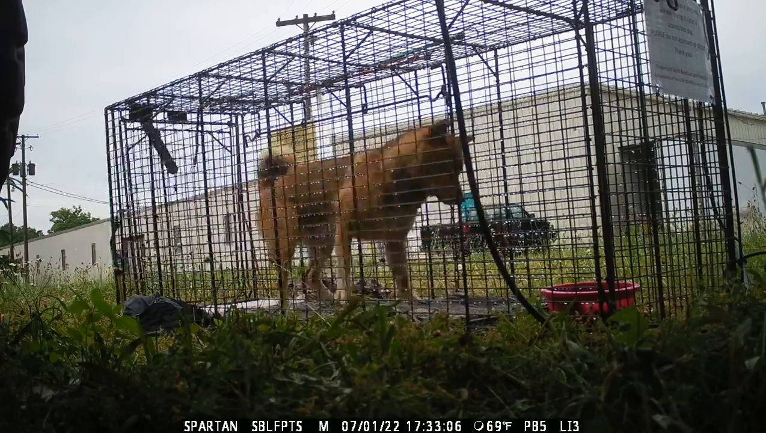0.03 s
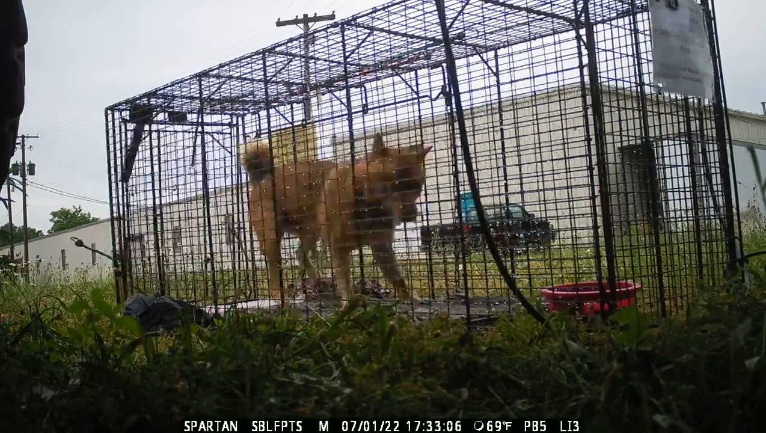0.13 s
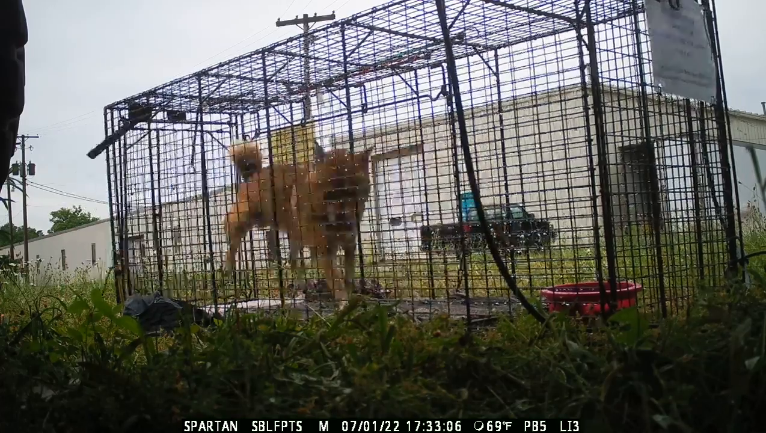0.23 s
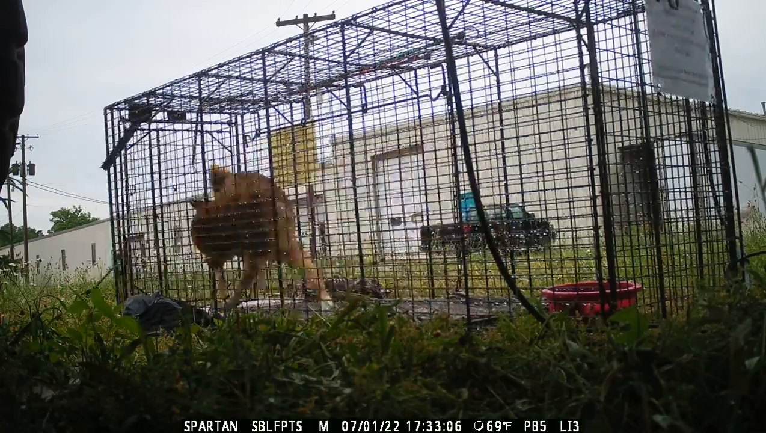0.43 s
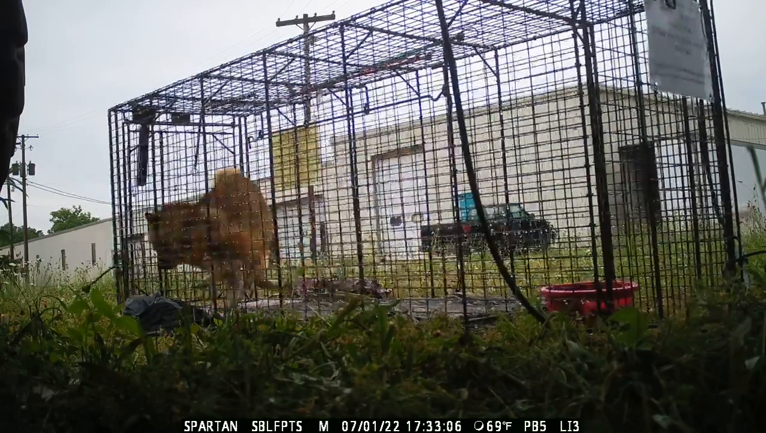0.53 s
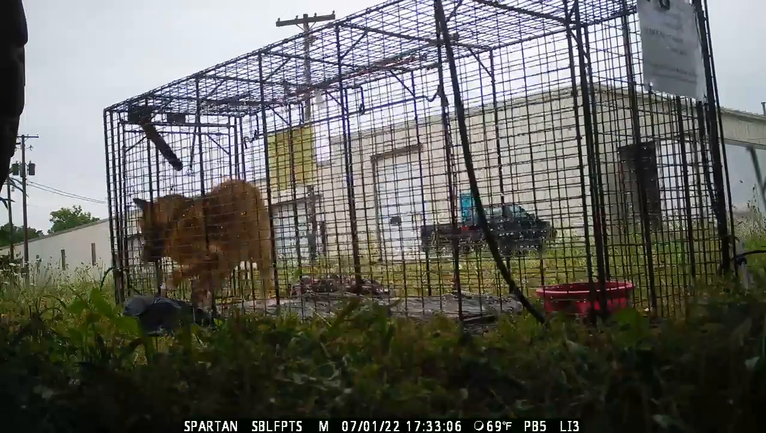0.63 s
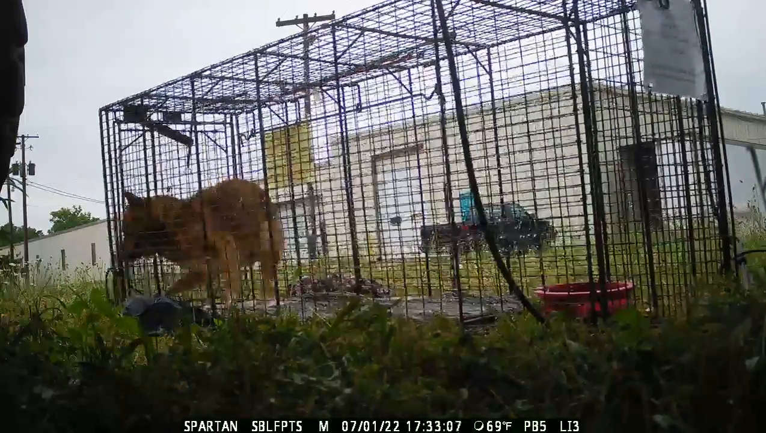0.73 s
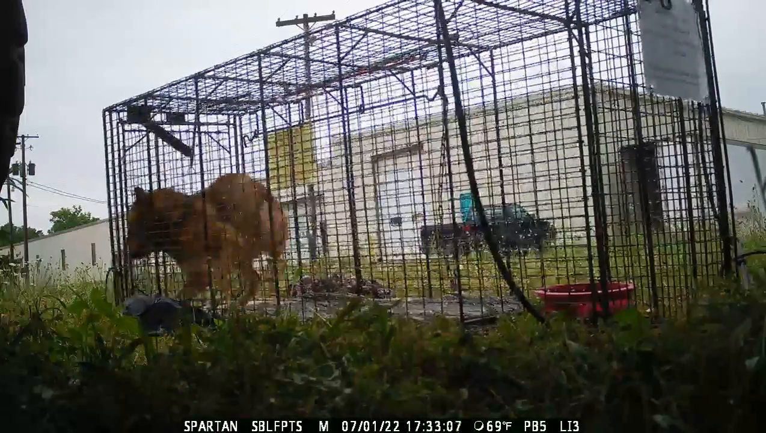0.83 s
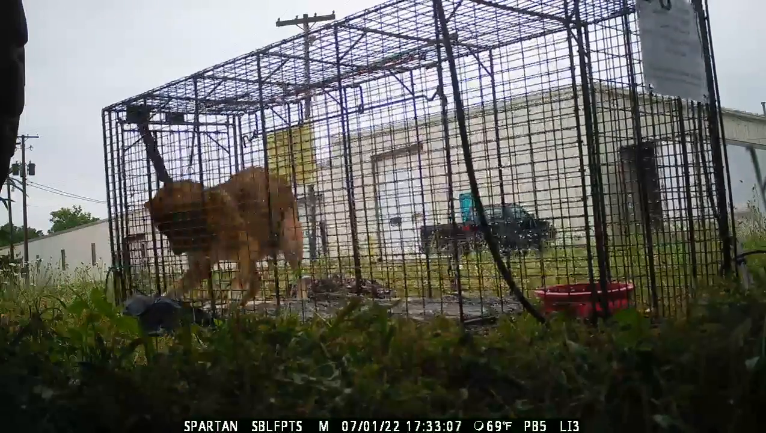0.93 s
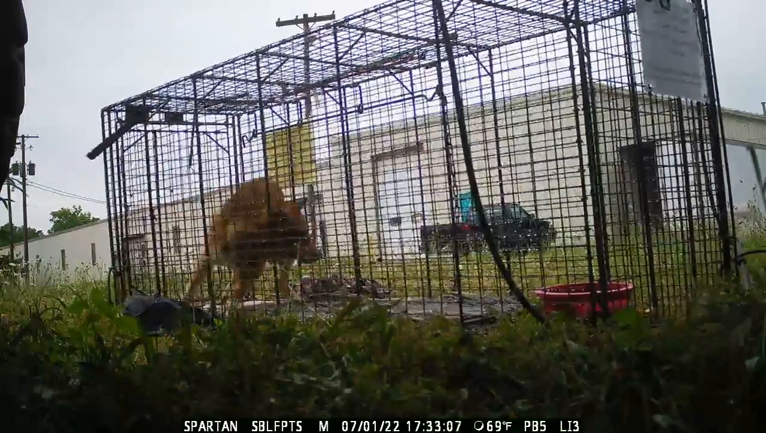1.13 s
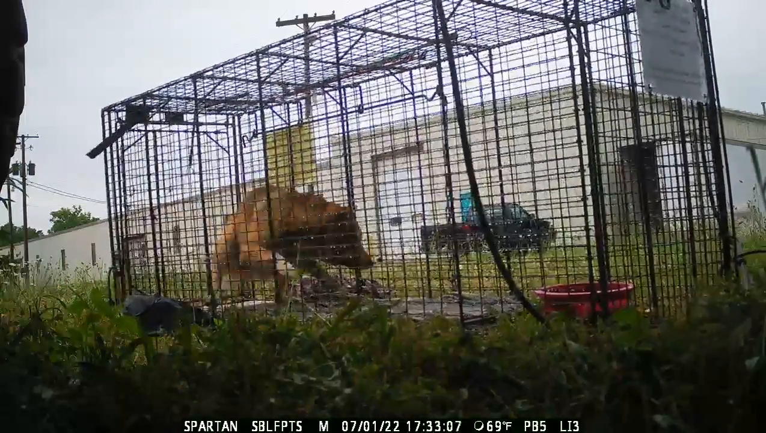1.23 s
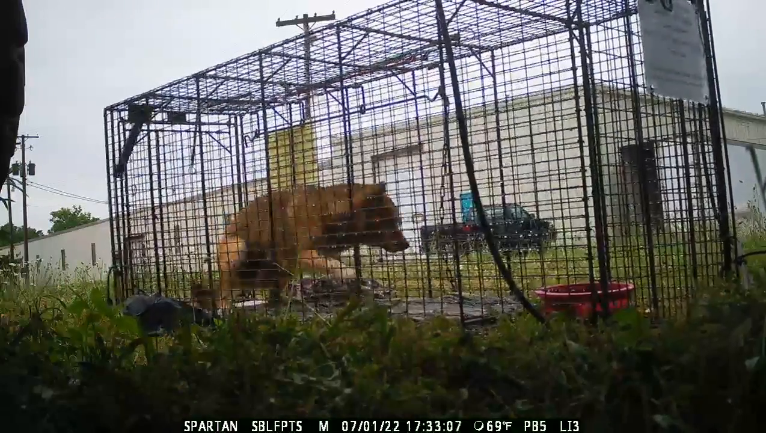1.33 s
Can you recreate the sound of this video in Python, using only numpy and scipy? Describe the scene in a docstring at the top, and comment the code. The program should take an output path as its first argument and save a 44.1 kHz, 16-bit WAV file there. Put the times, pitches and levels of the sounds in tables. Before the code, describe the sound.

A wire cage door clashes shut, then the mesh rattles as a dog turns inside.

```python
"""The door of a wire cage trap clashes shut on grass, rebounds and rattles, close to a small camera.
Each impact excites the modes of door and mesh: a bright clink, a chatter, a ring of long wires.
A dog turns round inside: its paws knock the floor and jolt the mesh, whose wires buzz and squeak.
The frame shudders on the ground, and a low outdoor rumble with a faint hum lies underneath."""
import sys
import numpy as np
from scipy import signal
from scipy.fft import rfft, irfft, next_fast_len
from scipy.io import wavfile
from scipy.ndimage import uniform_filter1d, map_coordinates

SR = 44100
rng = np.random.default_rng(int(sys.argv[2]) if len(sys.argv) > 2 else 0)


def store_wav(level_fs):
    """Save 16-bit WAV to argv[1]."""
    pcm = np.round(np.clip(np.atleast_2d(level_fs), -1, 1) * 32767)
    wavfile.write(sys.argv[1], SR, pcm.T.astype(np.int16))


N = 61739
TIME = np.arange(N) / SR

# Spectrum of the outdoor rumble. Each row: frequency in Hz, relative level in dB.
RUMBLE_SPECTRUM = [(20, -8.5), (45, 0.5), (90, 3.5), (200, -4.5), (300, -7), (700, -11), (2000, -10),
                   (5000, -21), (9000, -42.5)]
# Partials of the hum. Each row: frequency in Hz, level in dB.
HUM_PARTIALS = [(44, -68.5), (88, -57.5), (133, -62), (180, -64.5), (221, -66.5)]
# The whole cage shudders on the ground. Each row: time in seconds, level in dB.
SHUDDERS = [(.236, -46.5), (.28, -45), (0.336, -52.5), (.372, -54), (0.404, -47.5), (0.524, -52),
            (.76, -52.5)]
# Response of the frame. Each row: frequency in Hz, relative level in dB.
FRAME_SPECTRUM = [(20, -13), (42, 26), (65, 9), (100, 2), (155, 18), (240, 2.5), (500, -0.5), (1200, -14)]
# Paws on the cage floor. Each row: time in seconds, level in dB.
PAW_KNOCKS = [(0.506, -46), (0.696, -46), (.752, -51), (0.828, -49), (.858, -55), (.972, -60), (1.124, -58),
              (1.23, -51)]
# Response of the floor pan. Each row: frequency in Hz, relative level in dB.
FLOOR_SPECTRUM = [(60, -8), (160, -2), (260, -21.5), (390, 3.5), (560, -7.5), (1500, -28.5)]
# Wire rubbing on wire. Each row: centre in seconds, pitch in Hz, level in dB, half length in seconds.
SQUEAKS = [(0.112, 2646, -46.5, 0.014), (0.182, 5380, -51, .02), (0.295, 1218, -37.5, 0.015),
           (0.296, 3055, -33.5, 0.016), (0.33, 2830, -33.5, 0.012), (0.349, 3030, -34.5, 0.024),
           (0.393, 1812, -31, 0.0088), (0.789, 2956, -45, 0.02), (0.927, 2650, -34.5, 0.012),
           (1.077, 3970, -47.5, 0.0068), (1.095, 5130, -42, 0.038), (1.264, 2672, -52, 0.022),
           (1.262, 3953, -53.5, 0.041), (1.33, 5110, -56.5, 0.054)]
# Response of the mesh. Each row: frequency in Hz, relative level in dB.
MESH_SPECTRUM = [(100, -27.5), (300, -14), (650, -14), (950, -6.5), (1210, -1), (1550, -5), (1680, -3),
                 (1800, 9.5), (1930, -3), (2150, -1.5), (2450, -2.5), (2700, 2.5), (3050, 3.5), (3300, -1),
                 (3600, -8.5), (4000, 1.5), (4450, -2), (4850, 4.5), (5600, 2.5), (5950, -9.5), (6350, -3),
                 (7050, -14.5), (7500, -7), (8000, -21.5), (8400, -22.5), (9200, -54)]
# Envelope of the loose wires' buzz. Each row: time in seconds, level in dB.
RATTLE_LEVELS = [(0, -59.5), (.06, -58), (.14, -57.5), (.21, -51), (.25, -43), (.32, -39), (.42, -35.5),
                 (.49, -39.5), (.54, -46), (.62, -46.5), (.68, -41), (.76, -42), (.82, -47.5), (.94, -44.5),
                 (1.02, -46.5), (1.1, -47), (1.26, -49.5), (1.33, -50.5), (1.4, -59.5)]
# Long wires of door and frame. Each row: frequency in Hz, relative level in dB, T60 in seconds.
WIRE_MODES = [(888, -13, .45), (1203, -2, .35), (1775, -9, .5), (1808, -5, .45), (2643, 2, .5),
              (2857, -2, .4), (2955, -1, .55), (3055, -1, .35), (3968, -2, .5), (4216, -4, .45),
              (4705, -8, .45), (4870, -5, .45), (5114, -3, .7), (5430, -6, .4), (5701, -5, .45)]
# Wire striking wire. Each row: time in seconds, treble, middle and low levels in dB,
# T60 of the chatter in seconds, swell time in seconds.
CLASHES = [(0.0969, -50.5, -45.5, -44, 0.03, 0.0013), (.172, -54, -53, -52.5, 0.22, .012),
           (.226, -21.5, -41.5, -31, 0.043, 0.004), (.234, -29, -31, -28.5, 0.047, 0.0052),
           (0.265, -27.5, -33, -31.5, 0.095, 0.012), (0.279, -30, -29, -37, 0.2, .005),
           (.297, -29.5, -30.5, -32.5, 0.23, 0.0029), (0.339, -39.5, -38, -41, 0.15, 0.001),
           (.364, -27, -29.5, -36, 0.045, 0.0047), (.373, -32, -41, -32, 0.31, .001),
           (.411, -39.5, -52.5, -46.5, 0.16, 0.0023), (.449, -36, -39, -39.5, 0.25, 0.0071),
           (0.577, -37, -48, -44, 0.046, 0.0011), (0.612, -55.5, -46.5, -51, .08, 0.0059),
           (0.6412, -42, -52, -45.5, .08, .004), (0.6889, -32, -38, -39, 0.035, 0.0084),
           (.702, -47, -37, -42.5, 0.076, .003), (0.728, -36.5, -52, -45.5, 0.066, .005),
           (0.7502, -35, -45.5, -44, .04, .002), (0.764, -47.5, -45.5, -44.5, .06, .001),
           (0.8299, -46, -55, -45, 0.17, 0.006), (0.863, -49, -52.5, -43.5, 0.081, 0.015),
           (0.8928, -44.5, -45.5, -52.5, 0.24, .002), (.931, -40, -43.5, -42, 0.081, 0.015),
           (0.954, -45.5, -50.5, -46.5, 0.049, .002), (1.051, -43, -47, -46, 0.093, .005),
           (1.087, -43.5, -52, -51.5, 0.053, 0.0088), (1.178, -46, -52, -53, 0.066, 0.011),
           (1.2169, -45.5, -52, -56, 0.11, 0.0014), (1.251, -55, -50, -56, 0.074, 0.012),
           (1.3693, -51, -55.5, -55, 0.092, 0.0037)]
# The door's bright ring. Each row: frequency in Hz, relative level in dB, T60 in seconds.
DOOR_MODES = [(4750, 4, 0.063), (4554, -5, .035), (5250, 5, 0.015), (5450, 4, 0.035), (5800, 4, 0.039),
              (6080, 2, .02), (6560, -15, 0.012)]
# The door's edge hits the frame. Each row: start in seconds, peak level in dB.
DOOR_SLAMS = [(0.2223, -11), (.2295, -19), (0.3618, -17.5), (.373, -21.5)]

LOW_EDGE_HZ, TREBLE_EDGE_HZ = 2640, 4020  # the middle band lies between
RING_SAMPLES = int(0.4 * SR)


def amp(db):
    """Decibels to amplitude ratio."""
    return 10 ** (np.asarray(db) / 20)


def unit_rms(x):
    """Scale to rms 1."""
    return x / np.sqrt(np.mean(x ** 2) + 1e-20)


def filtered(x, response):
    """Filtering multiplies the spectrum of x by a frequency response."""
    size = next_fast_len(len(x) + 2048, True)
    return irfft(rfft(x, size) * response(np.fft.rfftfreq(size, 1 / SR)), size)[..., :len(x)]


def coloured(x, spectrum):
    """Filter x by (Hz, dB) points joined on a logarithmic frequency axis."""
    knots_hz, db = np.transpose(spectrum)
    return filtered(x, lambda hz: amp(np.interp(np.log(hz + 1), np.log(knots_hz + 1), db)))


def low_pass(hz, edge_hz, order=24):
    """Gain of a steep low-pass filter."""
    return 1 / (1 + (hz / edge_hz) ** order)


def noise(spectrum):
    """Coloured Gaussian noise of rms 1."""
    return unit_rms(coloured(rng.standard_normal(N), spectrum))


def wobble(rate):
    """A smooth random curve with rate knots a second."""
    coarse = TIME[::32]
    curve = map_coordinates(rng.standard_normal(1024), [coarse * rate], mode="wrap")
    return np.interp(TIME, coarse, curve)


def wavering_sine(hz, drift_rad, rate):
    """Random phase modulation makes a tone unsteady."""
    return np.sin(2 * np.pi * hz * TIME + drift_rad * wobble(rate))


def strike(peak_s, t60, swell_s=0.0028, t=TIME):
    """Envelope of a damped vibration: a quick swell, then a fall of 60 dB in t60 seconds."""
    return np.exp(np.minimum(t - peak_s, 0) / swell_s) * amp(-60 * np.maximum(t - peak_s, 0) / t60)


def contacts(per_second, size):
    """A Poisson process of tiny impacts, random in sign and strength."""
    strength_db = 3.5 * np.clip(rng.standard_normal(size), -2, 2)
    return (rng.random(size) < per_second / SR) * rng.choice([-1, 1], size) * amp(strength_db)


def outdoors():
    """Superposition: a broadband low rumble and the nearly harmonic partials of a faint hum."""
    hum = sum(amp(db) * np.sqrt(2) * wavering_sine(hz, drift_rad=1, rate=10) for hz, db in HUM_PARTIALS)
    return amp(-53.5) * noise(RUMBLE_SPECTRUM) + hum


def shudder():
    """Free vibration: the jolted frame shudders and the floor booms in its lowest mode."""
    frame_envelope = sum(amp(db) * strike(s, t60=0.36) for s, db in SHUDDERS)
    boom_envelope = sum(amp(db - 3.5) * strike(s, t60=0.41) for s, db in SHUDDERS)
    floor_mode = np.sqrt(2) * wavering_sine(hz=150, drift_rad=0.54, rate=38.9)
    return frame_envelope * noise(FRAME_SPECTRUM) + boom_envelope * floor_mode


def paws():
    """Impact excitation: each paw draws a dull, quickly damped knock from the floor pan."""
    return sum(amp(db) * strike(s, t60=0.09) for s, db in PAW_KNOCKS) * noise(FLOOR_SPECTRUM)


def squeaks():
    """Friction excitation: a rubbed wire swells and fades on one wavering note."""
    out = np.zeros(N)
    for centre_s, hz, db, half_s in SQUEAKS:
        pitch_hz = hz * (1 + 0.0046 * wobble(rate=250))
        envelope = amp(db) * np.exp(-((TIME - centre_s) / half_s) ** 2)
        out += envelope * np.sqrt(2) * np.sin(2 * np.pi * np.cumsum(pitch_hz) / SR)
    return out


def mesh(force):
    """Convolution: the mesh's modes lie so close that its impulse response is decaying noise."""
    t = np.arange(RING_SAMPLES) / SR
    crack, ring = (unit_rms(rng.standard_normal(len(t)) * amp(-60 * t / t60)) for t60 in (0.02, 0.2))
    vibration = signal.fftconvolve(force, crack + amp(-2.5) * ring)[:len(force)]
    return coloured(vibration, MESH_SPECTRUM)


def rattle():
    """Forced vibration: loose wires tap the mesh and buzz for as long as the cage shakes."""
    envelope = amp(np.interp(TIME, *np.transpose(RATTLE_LEVELS)))
    return envelope * unit_rms(mesh(contacts(per_second=560, size=N)))


def long_wires():
    """Resonance: long wires store energy from each clash and ring unsteadily as their joints shift."""
    growth, spread_db, waver_db = 0.99, 1.5, 3  # growth is dB of ring per dB of blow
    out = np.zeros(N)
    for hz, mode_db, t60 in WIRE_MODES:
        kicks = np.zeros(N)
        for s, treble_db, middle_db, low_db, *_ in CLASHES:
            blow_db = low_db if hz < LOW_EDGE_HZ else middle_db if hz < TREBLE_EDGE_HZ else treble_db
            kicks[round(s * SR)] = amp(growth * blow_db + mode_db + spread_db * rng.standard_normal())
        kept_per_sample = amp(-60 / (t60 * SR)) ** 2
        energy = signal.lfilter([1], [1, -kept_per_sample], kicks ** 2)
        tone = wavering_sine(hz, drift_rad=0.45, rate=35)
        out += np.sqrt(energy) * amp(waver_db * wobble(rate=35)) * tone
    return amp(-15) * out


def three_bands(hz):
    """Complementary crossover: treble, middle and low gains that sum to one."""
    low, under_treble = low_pass(hz, LOW_EDGE_HZ), low_pass(hz, TREBLE_EDGE_HZ)
    return np.array([1 - under_treble, under_treble - low, low])


def clashes():
    """Repeated impact: one hard contact and a dying chatter, brighter or duller by where it lands."""
    lead = 1024  # samples of swell before the hard contact
    t = (np.arange(RING_SAMPLES) - lead) / SR
    out = np.zeros(N + SR)
    for s, *levels_db, t60, swell_s in CLASHES:
        force = contacts(per_second=3200, size=len(t)) * strike(0, t60, swell_s, t)
        contact_db = -5 - 2199 * swell_s  # relative to the whole chatter; weaker after a slow swell
        force[lead] += amp(contact_db) * np.linalg.norm(force)
        bands = filtered(mesh(force), three_bands)
        peak_rms = np.sqrt(uniform_filter1d(bands ** 2, size=400).max(axis=1) + 1e-20)
        out[round(s * SR) - lead:][:len(t)] += (amp(levels_db) / peak_rms) @ bands
    return out[:N]


def door():
    """Modal decay: the door hits the frame and rebounds, its damped modes clinking at each blow."""
    attack_s = 0.00031
    t = np.arange(SR // 8) / SR
    out = np.zeros(N)
    for s, peak_db in DOOR_SLAMS:
        clink = sum(amp(db - 60 * t / t60) * np.sin(2 * np.pi * (hz * t + rng.random()))
                    for hz, db, t60 in DOOR_MODES)
        clink *= 1 - np.exp(-t / attack_s)
        out[round(s * SR):][:len(t)] += amp(peak_db) * clink / np.abs(clink).max()
    return out


def scene():
    """Linear superposition: the sources add in the open air, in mono."""
    return (door() + clashes() + long_wires() + rattle() + squeaks() + paws() + shudder()
            + outdoors())[None]


def record(dry):
    """Band limiting: the camera cuts off the highest treble steeply."""
    return np.array([filtered(x, lambda hz: low_pass(hz, edge_hz=8850, order=120)) for x in dry])


dry = scene()
out = record(dry)
store_wav(out)
```